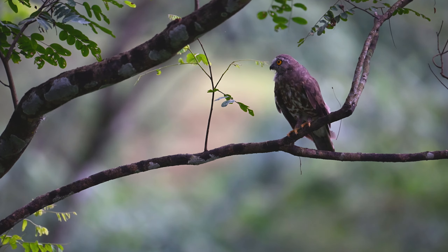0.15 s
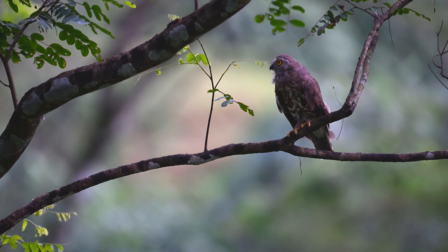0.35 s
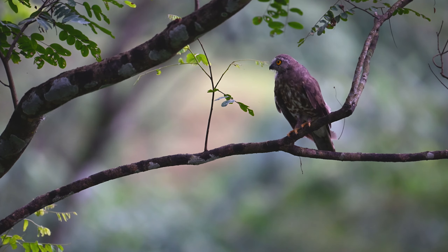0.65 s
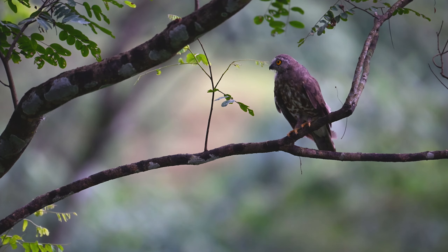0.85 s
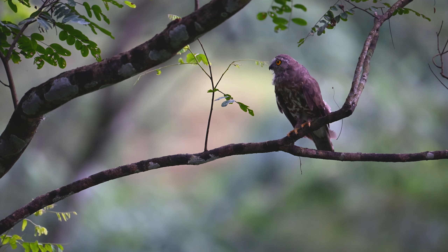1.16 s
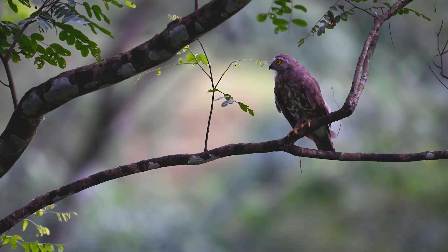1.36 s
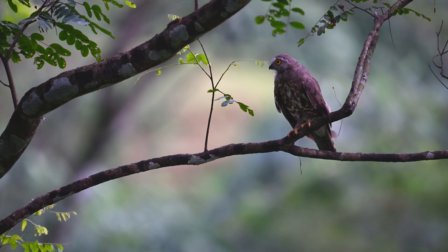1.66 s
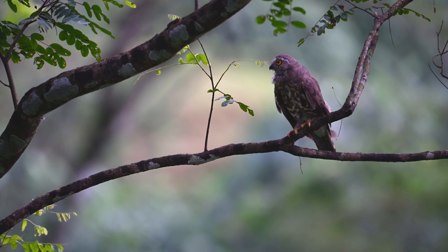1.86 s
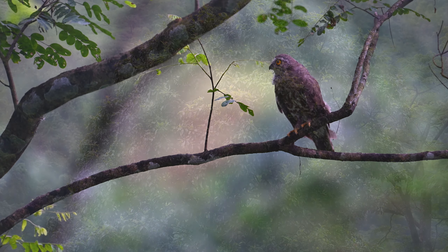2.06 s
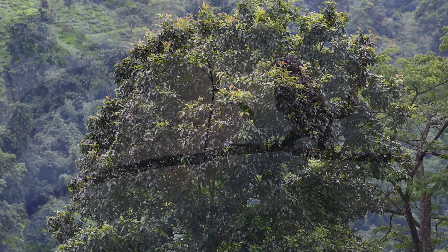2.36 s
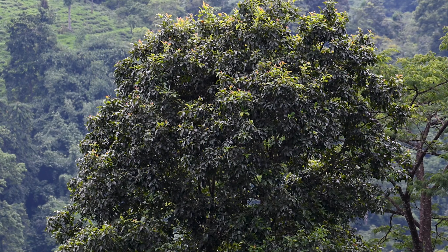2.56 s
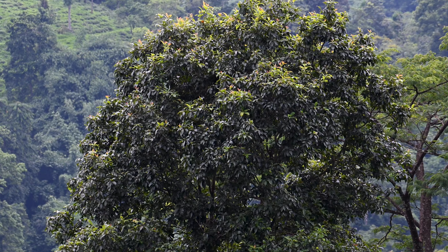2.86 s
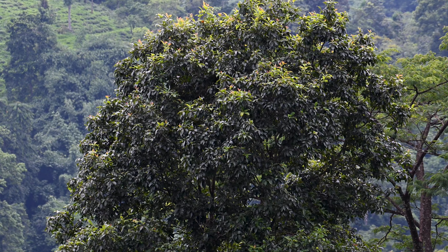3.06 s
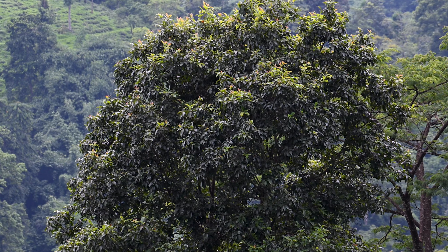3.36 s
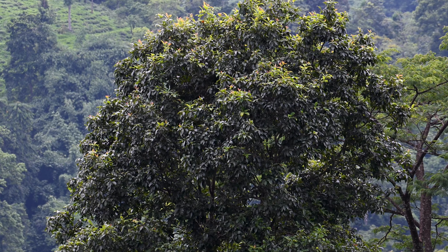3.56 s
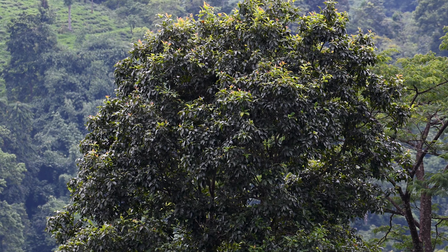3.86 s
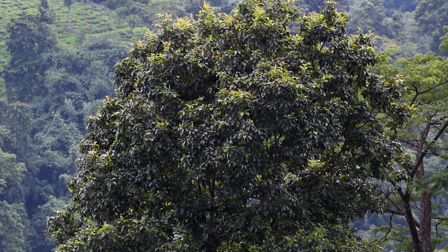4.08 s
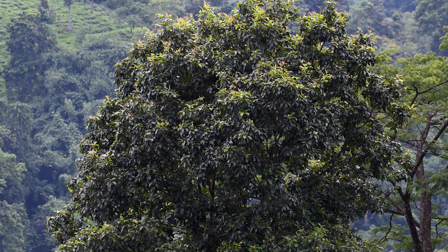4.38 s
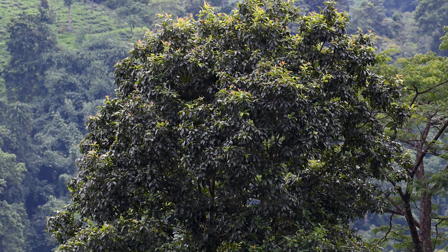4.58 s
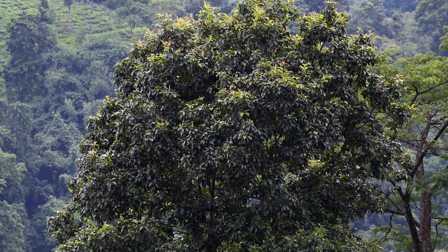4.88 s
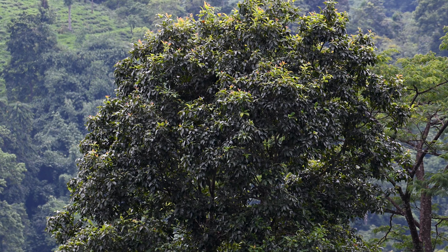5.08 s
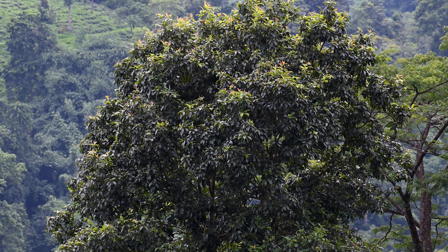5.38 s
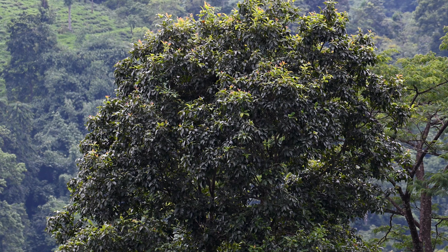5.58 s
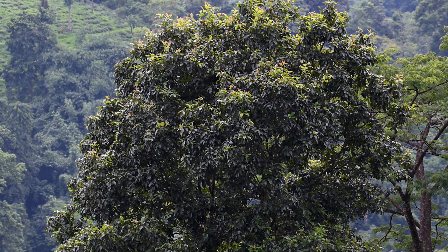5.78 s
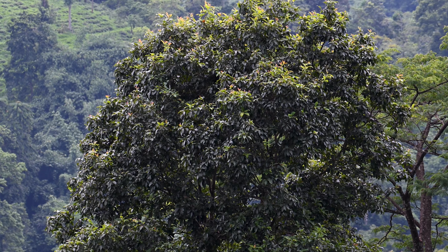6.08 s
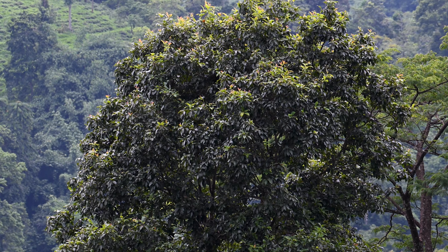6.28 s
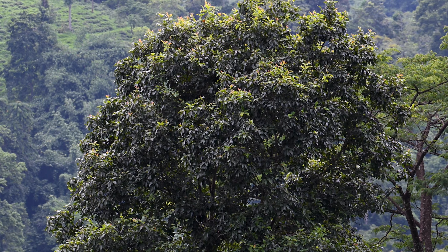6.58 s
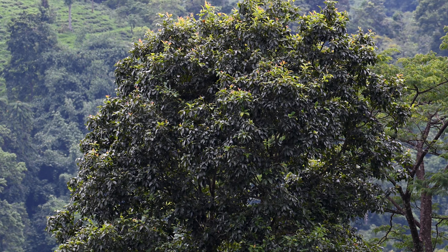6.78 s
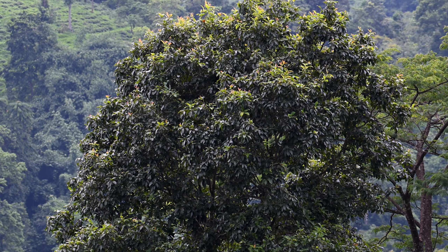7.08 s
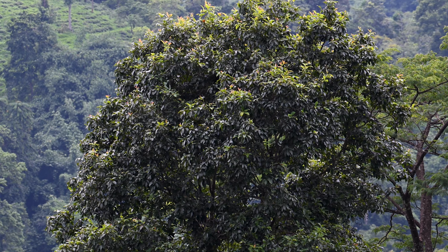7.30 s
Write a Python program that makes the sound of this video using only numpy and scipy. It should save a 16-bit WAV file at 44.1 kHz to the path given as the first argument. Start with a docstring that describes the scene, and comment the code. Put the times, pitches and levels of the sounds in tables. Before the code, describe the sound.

In a quiet forest, an owl gives six nearly pure hoots, each bending upward, about two thirds of a second apart. Soft air and faint insect chirps lie behind, in wide stereo with light tree echoes. The background drops away, swells back, and the owl resumes with a short lower hoot and a normal one. Finally a close mono view cuts in with insect hiss, a wind rumble and one loud, level hoot.

```python
"""A soft wash of forest air and a small chirping insect, then a series of nearly pure, rising owl hoots.
The wide view drops away and swells back, and the owl resumes with a short hoot and a lower one.
Near the end comes a close, mono view: insects hiss, wind rumbles and one loud hoot begins.
The voice is a sine of gliding pitch with faint overtones; chirps are sine pulses falling in pitch;
air, hiss and wind are noise of a given spectrum; trees scatter the sound as decaying noise echoes."""
import sys
import numpy as np
from scipy import signal
from scipy.fft import rfft, irfft
from scipy.io import wavfile
from scipy.ndimage import uniform_filter1d, minimum_filter1d

SR = 44100
rng = np.random.default_rng(int(sys.argv[2]) if len(sys.argv) > 2 else 0)


def file_out(sig):
    """Save sig as 16-bit WAV at sys.argv[1]."""
    # one column per channel
    cols = np.atleast_2d(sig).T
    # limit, then scale
    lim = np.clip(cols, -1, 1)
    pcm = np.round(lim * 32767).astype(np.int16)
    wavfile.write(sys.argv[1], SR, pcm)


N = 328104
T = np.arange(N) / SR  # time, s

# Noise spectra, relative levels per Hz: frequency_hz, level_db
AIR_SPECTRUM = [(53, -53.5), (90, -26), (150, -15), (288, -5), (444, -3.5), (490, -3), (541, -4),
                (646, -3.5), (771, -5.5), (997, -4.5), (2070, -10), (2520, -15), (3450, -19.5), (7590, -41),
                (10000, -43.5), (13000, -72.5), (22000, -120)]
HISS_SPECTRUM = [(500, -36.5), (850, -7.5), (1110, -5.5), (1210, -14.5), (1350, -11.5), (1490, -12),
                 (2090, -4), (3010, -16), (3980, 1.5), (6230, -16.5), (9190, -14.5), (10000, -18),
                 (10600, -30), (12800, -26), (15500, -34)]
MID_BAND_SPECTRUM = [(150, -58.5), (250, -25.5), (319, -25.5), (423, 0.5), (616, -3), (701, -10.5),
                     (770, -20.5), (1400, -33), (1820, -54.5), (3080, -120)]
WIND_SPECTRUM = [(20, -12), (42, 4), (75, -3), (120, -23.5), (160, -25), (240, -22.5), (320, -32),
                 (600, -62)]
RUSTLE_SPECTRUM = [(600, -26.5), (1000, -3.5), (2200, 7.5), (3200, -7.5), (6000, -33)]
PUFF_SPECTRUM = [(35, -14.5), (72, 6.5), (125, -5.5), (160, -21), (400, -48.5)]
TICK_SPECTRUM = [(500, 6), (2500, -3.5), (8000, -19.5), (15000, -18)]
# Strength of the gust: time_s, level_db
GUST_LEVEL = [(7.12, -22.5), (7.18, -22.5), (7.24, -29), (7.3, -34), (7.44, -31.5)]
# Runs of evenly spaced insect chirps: first_syllable_s, chirps, spacing_s, level_db
CHIRP_RUNS = [(.009, 2, .346, -62), (.822, 2, .351, -64), (1.325, 2, .334, -64), (2.027, 2, .345, -61.5),
              (2.84, 5, .336, -63), (4.428, 2, .394, -57), (5.164, 3, .352, -56.5), (6.218, 3, .347, -59)]
# Thin, far twitters: first_note_s, notes, pitch_hz, level_db
TWITTERS = [(0.67, 2, 6200, -70), (2.685, 2, 6200, -72), (5.31, 9, 6308, -76), (6.34, 3, 6250, -70.5),
            (6.461, 6, 6500, -77.5)]
# Hoots, levels ahead of the throat resonance:
# start_s, crest_after_s, base_hz, scoop_hz, rise_hz, level_db, attack_s, overtones_db
HOOTS = [(.174, .3, 568, 112, 105, -9.6, .04, -1), (.83, .292, 563, 104, 108, -10, .036, -2),
         (1.454, .294, 568, 116, 105, -9.9, .048, -2), (2.19, .3, 568, 112, 105, -9.6, .04, -1.5),
         (2.846, .294, 563, 104, 108, -9.3, .036, -2.5), (3.637, .294, 568, 116, 105, -9.3, .048, -2),
         (5.676, .168, 516, -64, 116, -14.6, .06, -5), (6.388, .307, 545, 100, 117, -10.6, .038, -1)]
# The loud, level hoot of the close view, same columns; no resonance is applied to it
CLOSE_HOOT = (7.232, .3, 548, 130, 0, -4.1, .068, -17)
# Overtones of the voice, ahead of the throat's passage: multiple, level_db
OVERTONES = [(2, -29), (3, -51.5), (4, -56)]
# How well the throat passes the overtones, best at middle pitch: pitch_hz, level_db
THROAT_PASSAGE = [(500, -7), (560, 2.5), (585, 1.5), (620, -5.5), (670, -13)]
# Throat resonance, which sets loudness by pitch: pitch_hz, level_db
RESONANCE = [(460, -24), (516, -15), (545, -8), (564, -3.4), (585, -1.7), (620, .2), (648, 2.2),
             (676, -3.2)]
# A reflection shifts the owl sideways with its pitch: pitch_hz, left_minus_right_db
SIDEWAYS = [(480, 2.5039), (555, 1.5), (585, 1.6512), (640, 0.0881), (672, -4)]
# Echoes from single stands of trees: delay_s, level_db, left_minus_right_db
ECHOES = [(.027, -31, 3.5), (.055, -37, -3.5), (.086, -33, -0.5)]

# Shape of a hoot: pitch slide and overshoot, climb to the crest and drop, then loudness
SCOOP_S = .05
OVERSHOOT_RATIO, OVERSHOOT_AT_S, OVERSHOOT_S = .19, .085, .039
CLIMB_S, DROP_S = .064, .034
HOLD_S, RELEASE_S, RELEASE_DEPTH_DB = .025, .036, 34
ATTACK_DEPTH_DB, SAG_DB_PER_S = 28, 240
# Wide view: dropout, low return and swell; a second gap precedes the close view
DROPOUT_S, GAP_S, GAP_DB = 4.254, .02, -30
RETURN_DB, RETURN_S = -16.5, 1.08
CLOSE_VIEW_S = 7.122
TOP_HZ = 15750  # upper edge of the sound; almost nothing is heard above it


def undb(db):
    """Level to amplitude: 20 dB is a factor of ten."""
    return 10 ** (np.asarray(db) / 20)


def curve(rows, at):
    """Linear interpolation of each table column against the first."""
    key, *columns = np.transpose(rows)
    return [np.interp(at, key, c) for c in columns]


def add(out, sound, start):
    """Superposition: a sound adds to the mix from a given time in seconds."""
    i = max(int(start * SR), 0)
    out[..., i:i + sound.shape[-1]] += sound[..., :N - i]


def noise(spectrum):
    """Spectral shaping: white noise weighted by frequency, then scaled to rms 1."""
    hz, db = np.transpose(spectrum)
    bin_hz = np.arange(N // 2 + 1) * SR / N
    gain = undb(np.interp(np.log(bin_hz + 1), np.log(hz), db))
    x = irfft(rfft(rng.standard_normal(N)) * gain, N)
    return x / x.std()


def walk(rate, size):
    """Slow random fluctuation: chance steps at a rate in Hz, smoothed, with standard deviation 1."""
    step = int(SR / rate)
    held = np.repeat(rng.standard_normal(size // step + 1), step)
    x = uniform_filter1d(held, step)[:size]
    return x / x.std()


def bump(t, before_s, after_s):
    """Asymmetric Gaussian: a smooth rise to 1 at t = 0 and a fall, each with its own width."""
    return np.exp(-(t / np.where(t < 0, before_s, after_s)) ** 2)


def trees(x, t60, build_s):
    """Diffuse scattering from trunks and leaves: builds up, decays 60 dB in t60, differs left and right."""
    t = np.arange(SR) / SR
    envelope = np.exp(-np.log(1000) * t / t60) * (1 - np.exp(-t / build_s))
    echo = rng.standard_normal((2, SR)) * envelope
    echo /= np.sqrt(np.sum(echo ** 2, axis=1, keepdims=True))  # unit energy
    return signal.fftconvolve(x[None], echo, axes=1)[:, :N]


def air(level_db=-43.2, flicker_db=1.0477):
    """Incoherent noise: a soft wash of forest air, independent left and right."""
    return np.array([noise(AIR_SPECTRUM) * undb(level_db + flicker_db * walk(10, N)) for _ in range(2)])


def chirp(count, hz, fall_hz, syllable_s, period_s, scatter_db=1.5776):
    """Pulsed tone: Gaussian syllables of falling pitch and random strength, the first half a period in."""
    t = np.arange(int(count * period_s * SR)) / SR
    place = (t % period_s - period_s / 2) / syllable_s  # time from the syllable's peak, in its widths
    strengths = undb(scatter_db * rng.standard_normal(count + 1))
    size = strengths[(t / period_s).astype(int)]
    phase = 2 * np.pi * np.cumsum(hz - fall_hz * place) / SR
    return np.sqrt(2) * size * np.exp(-place ** 2) * np.sin(phase)


def insects(period_s=.036, echo_db=-5.5):
    """Direct and scattered sound: a near chirper and a thin far twitter, both blurred by the leaves."""
    near, far = np.zeros(N), np.zeros(N)
    for start, count, spacing_s, db in CHIRP_RUNS:
        for k in range(round(count)):
            syllables = chirp(4, hz=5295, fall_hz=165, syllable_s=.0075, period_s=period_s)
            add(near, undb(db) * syllables, start + k * spacing_s - period_s / 2)
    for start, count, hz, db in TWITTERS:
        notes = chirp(round(count), hz=hz, fall_hz=110, syllable_s=.006, period_s=period_s)
        add(far, undb(db) * notes, start - period_s / 2)
    # the far twitter is scattered more
    return near + far + undb(echo_db) * trees(near + 2 * far, t60=.16, build_s=.002)


def massed_insects(level_db=-39, throb_db=.5921):
    """Amplitude-modulated noise: many insects merge into a hiss whose level throbs slightly."""
    return noise(HISS_SPECTRUM) * undb(level_db + throb_db * walk(40, N))


def mid_band(level_db=-29.5):
    """Stationary noise: a steady band of noise, strongest around 400 to 650 Hz."""
    return noise(MID_BAND_SPECTRUM) * undb(level_db)


def gust(rustle_db=-19):
    """Turbulence: a gust buffets the microphone and stirs the leaves under one envelope."""
    return (noise(WIND_SPECTRUM) + undb(rustle_db) * noise(RUSTLE_SPECTRUM)) * undb(curve(GUST_LEVEL, T)[0])


def puff(level_db=-27, peak_s=7.16, width_s=.03908):
    """Turbulent pressure: a low puff of wind on the microphone, Gaussian in time."""
    return undb(level_db) * noise(PUFF_SPECTRUM) * np.exp(-((T - peak_s) / width_s) ** 2)


def twig_tick(level_db=-28, peak_s=7.198, decay_s=.00091):
    """Impulsive excitation: a twig ticks as a very brief burst of noise."""
    return undb(level_db) * noise(TICK_SPECTRUM) * np.exp(-abs(T - peak_s) / decay_s)


def hoot(crest_s, base_hz, scoop_hz, rise_hz, level_db, attack_s, overtone_db, shimmer_db=.2):
    """Harmonic voice under frequency modulation: one hoot scoops, settles and climbs; also returns its pitch."""
    t = np.arange(int((crest_s + HOLD_S + RELEASE_S) * SR)) / SR
    overshoot = OVERSHOOT_RATIO * bump(t - OVERSHOOT_AT_S, OVERSHOOT_S, OVERSHOOT_S)
    slide = overshoot - bump(t, SCOOP_S, SCOOP_S)
    hz = base_hz + scoop_hz * slide + rise_hz * bump(t - crest_s, CLIMB_S, DROP_S)
    hz = hz * (1 + .0012 * walk(100, len(t)))  # slight tremble
    # the voice fades in, sags after the crest, and shuts off after a brief hold
    attack = ATTACK_DEPTH_DB * np.maximum(1 - t / attack_s, 0)
    sag = SAG_DB_PER_S * np.maximum(t - crest_s, 0)
    release = RELEASE_DEPTH_DB * np.maximum(t - crest_s - HOLD_S, 0) / RELEASE_S
    db = uniform_filter1d(level_db - attack - sag - release, size=300)
    db = db + shimmer_db * walk(120, len(t))
    phase = 2 * np.pi * np.cumsum(hz) / SR
    overtones = sum(undb(part_db) * np.sin(round(k) * phase) for k, part_db in OVERTONES)
    voice = np.sin(phase) + undb(overtone_db + curve(THROAT_PASSAGE, hz)[0]) * overtones
    ends = signal.windows.tukey(len(t), .05)
    return np.sqrt(2) * voice * ends * undb(db), hz


def owl(echo_db=-28, lead_rad=.09):
    """Resonance and reflection: the throat weights each pitch, then trees return echoes and a diffuse tail."""
    out = np.zeros((2, N))
    for start, *call in HOOTS:
        voice, hz = hoot(*call)
        pan_db = curve(SIDEWAYS, hz)[0]
        sides_db = np.array([pan_db, -pan_db]) / 2
        add(out, voice * undb(curve(RESONANCE, hz)[0] + sides_db), start)
    # phase lead: the sound reaches the right microphone a little earlier
    out[1] = np.real(signal.hilbert(out[1]) * np.exp(1j * lead_rad))
    direct = out.mean(axis=0)
    for delay, db, pan_db in ECHOES:
        add(out, direct * undb(db + np.array([[pan_db], [-pan_db]]) / 2), delay)
    return out + undb(echo_db) * trees(direct, t60=.45, build_s=.02)


def close_view():
    """Superposition in mono: hiss, mid band, gust, puff and tick, with the owl calling from close by."""
    out = massed_insects() + mid_band() + gust() + puff() + twig_tick()
    start, *call = CLOSE_HOOT
    add(out, hoot(*call)[0], start)
    return out


def fade():
    """Gain envelope of the wide view: full, a gap, a swell linear in decibels, and a last gap."""
    swell_db = RETURN_DB * np.clip(1 - (T - DROPOUT_S - GAP_S) / RETURN_S, 0, 1) * (T > DROPOUT_S)
    first_gap = (T > DROPOUT_S) & (T < DROPOUT_S + GAP_S)
    last_gap = T > CLOSE_VIEW_S - GAP_S
    return undb(uniform_filter1d(np.where(first_gap | last_gap, GAP_DB, swell_db), size=250))


def scene():
    """Two listening positions in turn: the wide stereo view, then the close mono one."""
    wide = (owl() + insects() + air()) * fade()
    return np.where(T < CLOSE_VIEW_S, wide, close_view())


def record(dry):
    """Limiting and band limitation: smooth gain holds peaks under full scale, then a low-pass cuts the top."""
    room = np.minimum(1, .97 / (np.abs(dry).max(axis=0) + 1e-9))
    gain = uniform_filter1d(minimum_filter1d(room, size=600), size=500)
    low_pass = signal.ellip(8, .2, 70, TOP_HZ, fs=SR, output="sos")
    return signal.sosfilt(low_pass, dry * gain)


dry = scene()
out = record(dry)
file_out(out)
```